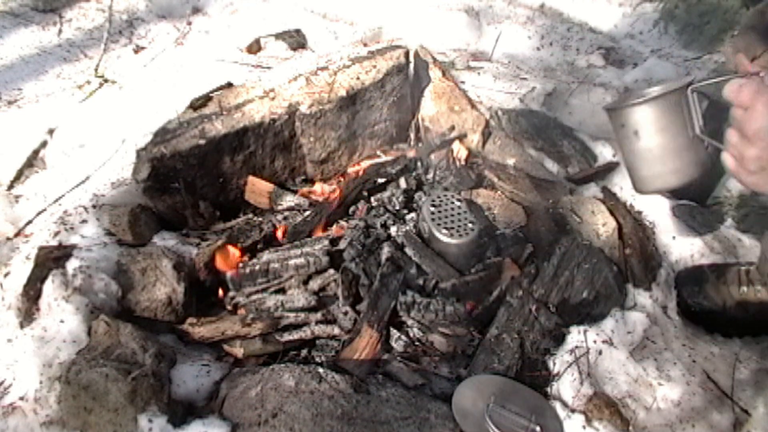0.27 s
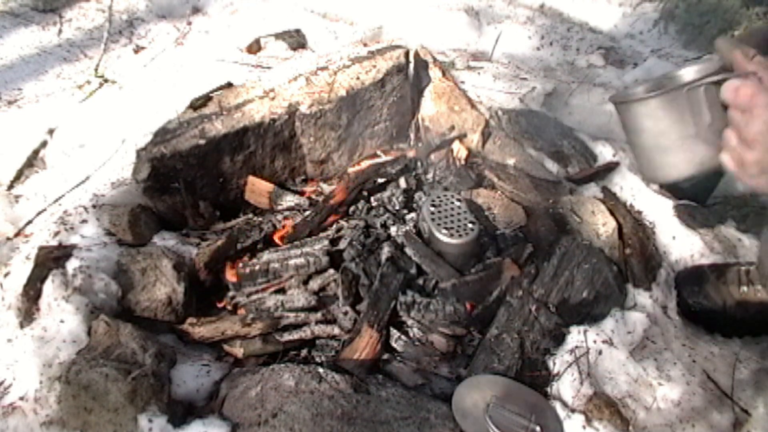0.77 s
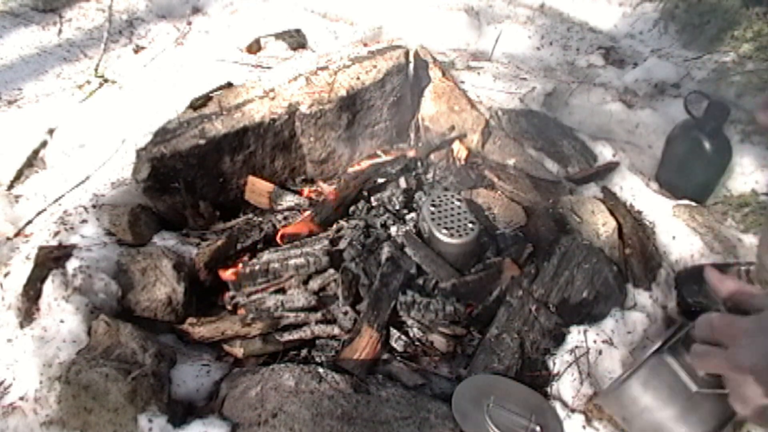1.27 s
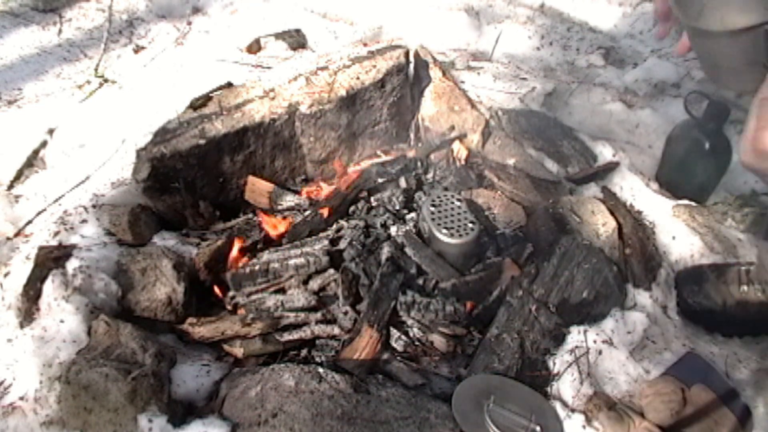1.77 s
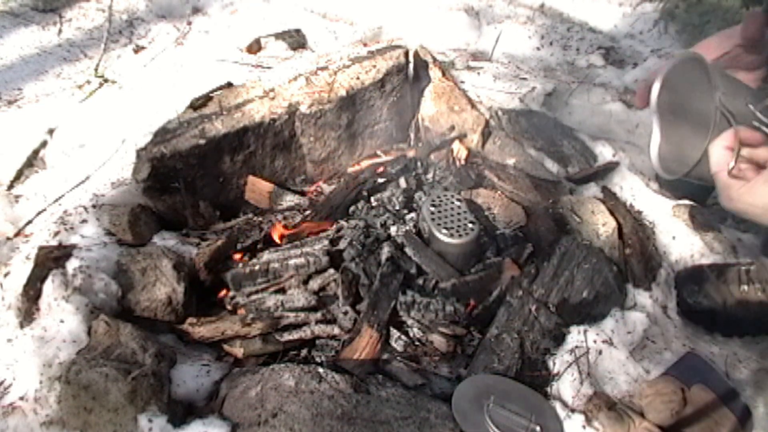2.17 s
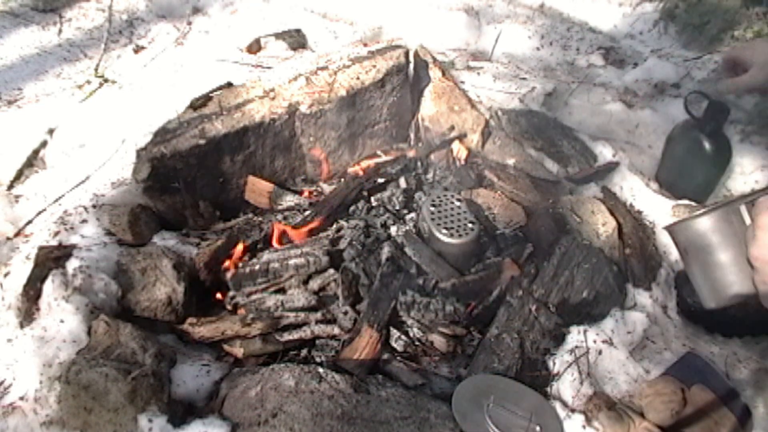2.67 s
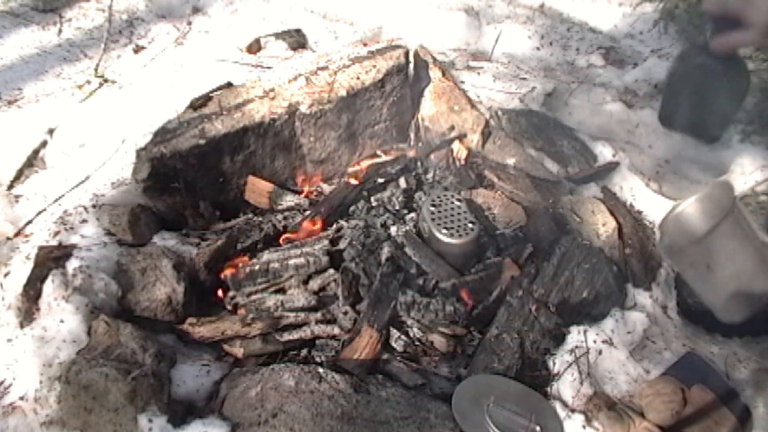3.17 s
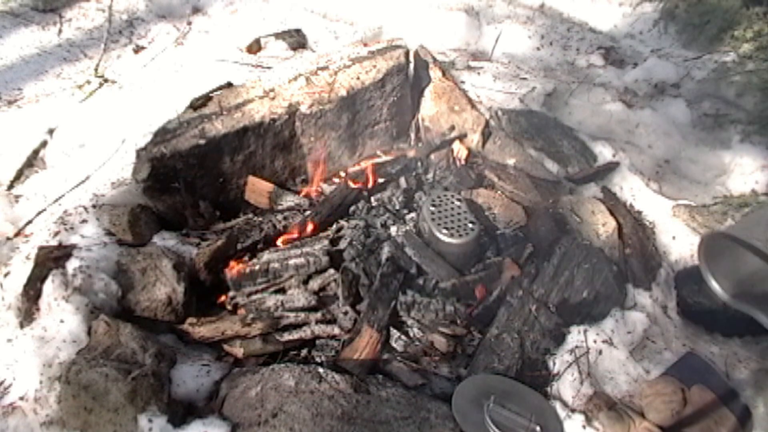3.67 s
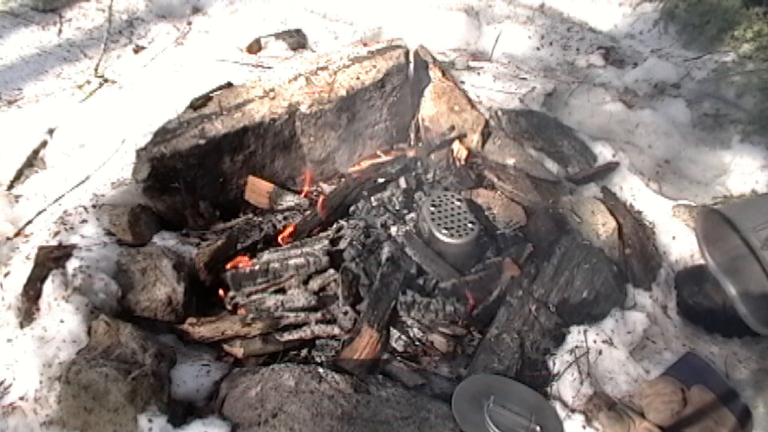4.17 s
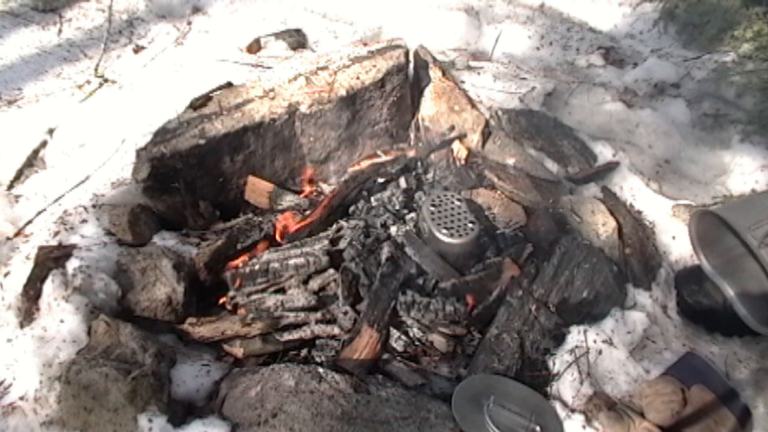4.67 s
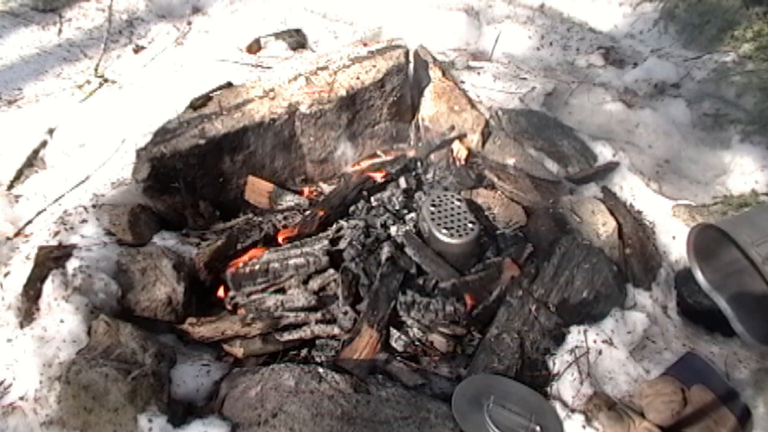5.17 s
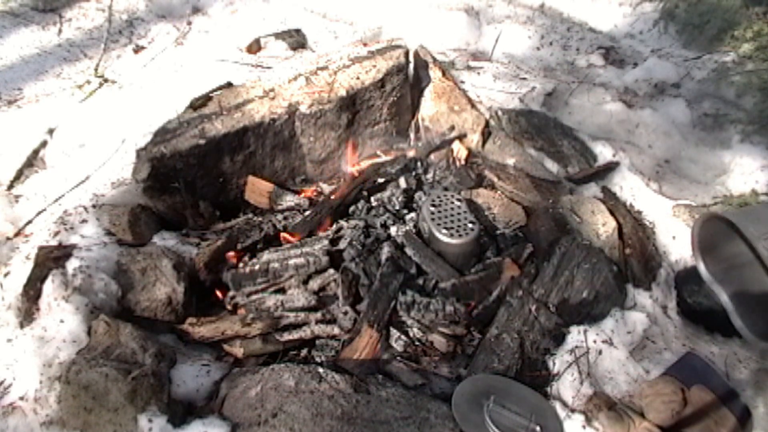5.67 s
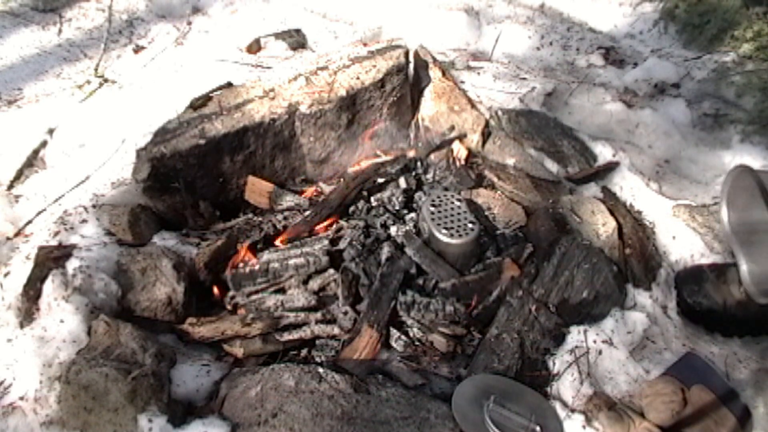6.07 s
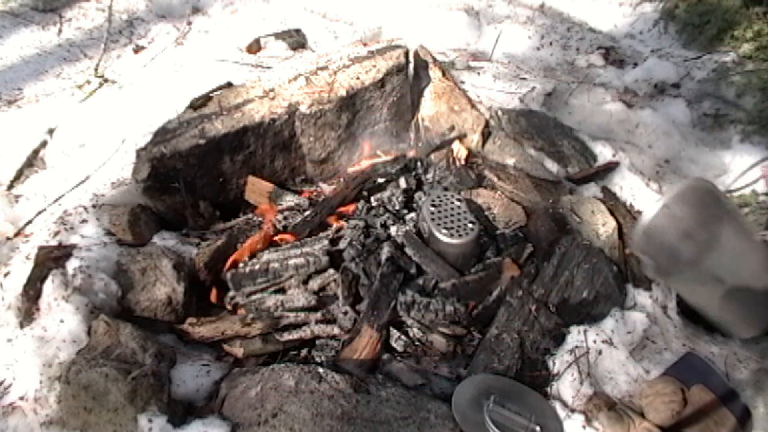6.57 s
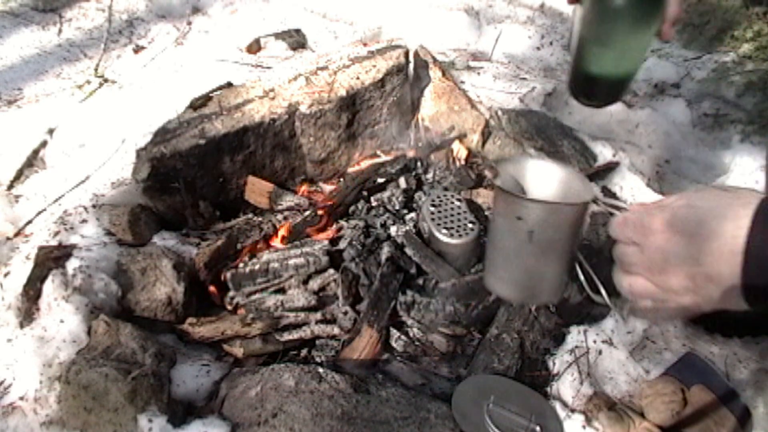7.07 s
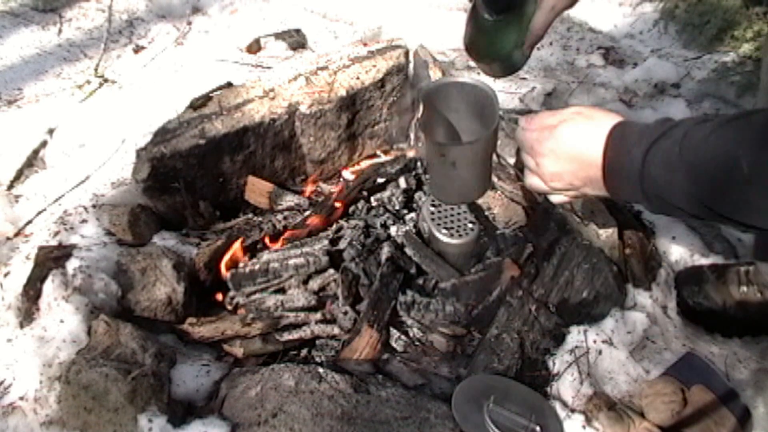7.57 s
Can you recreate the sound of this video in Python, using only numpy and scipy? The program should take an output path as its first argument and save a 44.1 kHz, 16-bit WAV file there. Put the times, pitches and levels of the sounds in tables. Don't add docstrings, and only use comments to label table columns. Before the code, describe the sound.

Bright metal cup clatter, loudest early on, gives way to plastic cap clicks, hollow bottle knocks and tiny fire pops outdoors.

```python
import sys
import numpy as np
from scipy import signal
from scipy.io import wavfile
from scipy.ndimage import uniform_filter1d

SR = 44100
rng = np.random.default_rng(int(sys.argv[2]) if len(sys.argv) > 2 else 0)


def attenuation_scalar(level_db):
    decades = np.asarray(level_db, float) / 20
    return 10 ** decades


def wav_record(signal):
    frames = np.transpose(np.atleast_2d(signal))
    bounded = np.clip(frames, -1, 1)
    quanta = np.round(bounded * 32767).astype(np.int16)
    wavfile.write(sys.argv[1], SR, quanta)


N = 345539

# frequency in Hz, level in dB per Hz.
AIR_SPECTRUM = [(20, -24.5), (30, -21.5), (60, -7.5), (95, 2.5), (250, -2.5), (600, -5), (1100, -11),
                (1600, -9.5), (2600, -20.5), (5000, -29.5), (11000, -28.5), (16000, -24.5)]
# frequency in Hz, level in dB per Hz.
RUSTLE_SPECTRUM = [(700, 9), (1500, -3.5), (3500, 5), (6500, -1.5), (11000, -3), (16000, -52)]
# frequency in Hz, likeness from 0 to 1.
LIKENESS = [(60, 0.69), (130, 0.86), (290, 0.93), (640, 0.9), (1410, 0.89), (3100, 0.81), (6820, 0.87),
            (15000, 0.59)]
# frequency in Hz, left minus right in dB.
LEAN = [(60, -0.5), (110, -0.5), (200, -0.5), (380, -0.5), (700, -0.5), (1290, -0.5), (2380, -2.5),
        (4400, -2.5), (8120, -1.0), (15000, 1.0)]
# start in seconds, peak in dB, centre in Hz.
LOUD_POPS = [(0.7236, -28, 4150), (0.7986, -21.5, 12200), (0.817, -30, 8600), (1.1262, -35, 8500),
             (1.734, -30, 6000), (2.856, -26.5, 11950), (3.5589, -18.5, 10800), (3.565, -26, 8000),
             (3.645, -34, 11300), (3.8612, -34, 4360), (3.9427, -34, 13100), (4.0786, -38, 9100),
             (4.2156, -27, 5270), (4.2202, -21, 10800), (4.733, -31.5, 9800), (4.9663, -24, 10240),
             (4.978, -30, 7800), (5.3483, -32.5, 6410), (5.3612, -29, 10960), (5.5356, -21.5, 7140),
             (5.5658, -35, 6800), (5.716, -28.5, 6440), (5.848, -35, 11800), (5.875, -36.5, 10200),
             (5.926, -36, 7640), (6.1677, -32, 6330), (6.4842, -33.5, 8700), (6.528, -32, 11700),
             (7.311, -28.5, 6740), (7.3662, -23.5, 13400), (7.504, -36.5, 7620), (7.7352, -34.5, 9900)]
# start in seconds, peak in dB.
WET_TICKS = [(5.788, -35), (6.0617, -32.5), (6.2258, -27), (6.31, -31), (6.334, -23.5), (6.3809, -31.5),
             (6.5863, -21), (6.6005, -33.5), (6.6714, -33), (6.845, -46), (7.2662, -36.5), (7.3244, -36),
             (7.8071, -33)]
# start in seconds, peak in dB,
# centre in Hz.
FAINT_POPS = [(1.1248, -34, 6620), (2.2827, -36, 5850), (2.7092, -41, 9240), (6.795, -33.5, 6000),
              (3.027, -44.5, 5940), (3.063, -38, 8870), (3.1951, -49, 5130), (3.5244, -44, 8750),
              (3.53, -35, 10200), (3.575, -27, 5480), (3.584, -36, 8680), (3.678, -42, 11900),
              (7.0, -37, 4480), (4.0073, -39, 13200), (4.0567, -45.5, 10800), (4.1704, -41, 8480),
              (4.4942, -43, 9420), (4.5136, -34, 6040), (4.6474, -49.5, 11340), (4.8653, -37, 11600),
              (5.111, -30, 11800), (6.942, -50, 5400), (5.4946, -42, 9640), (5.5704, -34, 6610),
              (5.585, -33, 11000), (5.6166, -43, 8450), (5.6597, -19, 9000), (5.7523, -43, 6470),
              (5.7828, -33.5, 5940), (5.8167, -42, 14000), (5.8257, -39, 9260), (5.8584, -40, 8280),
              (5.904, -36.5, 6100), (5.9648, -48, 5250), (5.9904, -43, 14000), (6.0013, -37.5, 6350),
              (6.0955, -39, 5840), (6.2744, -52, 6400), (6.4014, -41, 7460), (6.4564, -44, 6420),
              (6.5078, -35.5, 5400), (6.6897, -48, 5670), (6.9154, -35, 5130), (7.165, -40, 8400),
              (7.2374, -37, 7400), (7.2978, -37, 6170), (7.4584, -47, 7110), (7.475, -41, 9020),
              (7.7064, -37, 11600), (7.746, -35, 12500)]
# start in seconds, length in seconds, level in dB.
STROKES = [(0, 0.76, -48.5), (0.605, 1.1, -46), (1.189, 0.52, -45.5), (1.711, 0.34, -37),
           (2.02, 0.57, -48.5), (3.048, 0.21, -53), (4.01, 0.29, -55.5), (4.479, 0.14, -45),
           (4.835, 0.13, -48), (5.11, 0.22, -49), (5.447, 1.4, -56.5), (6.673, 0.65, -51),
           (6.738, 0.13, -49.5), (3.96, .08, -59.5), (4.208, 0.028, -43.5), (7.242, 0.19, -53),
           (7.598, 0.45, -56)]
# start
# in seconds, peak in dB, mode in Hz, t60 in seconds.
KNOCKS = [(1.311, -14.5, 1170, 0.028), (2.776, -48, 921, 0.12), (1.311, -26, 258.4, 0.008),
          (2.568, -29, 215, 0.02), (2.718, -34.5, 232, 0.041), (3.29, -35, 154, 0.051),
          (3.699, -33, 199, 0.023), (3.795, -31.5, 247, 0.018), (3.824, -39, 730, 0.052),
          (4.114, -43, 60, 0.18), (4.446, -25, 332, 0.024), (4.54, -39, 845, 0.092),
          (5.137, -33.5, 292, 0.11), (5.221, -26, 333, 0.051), (5.223, -34, 1820, 0.069),
          (5.255, -41.5, 746, 0.1), (5.576, -39.5, 1690, 0.066), (5.6561, -19, 1593, 0.049),
          (5.657, -18.5, 580, 0.062), (5.679, -35, 758, 0.12), (6.167, -29.5, 258, 0.018),
          (6.258, -37, 851, 0.073), (6.552, -38, 837, 0.066), (7.674, -40.5, 854, 0.11),
          (7.69, -38, 306, 0.2), (7.724, -36, 376, 0.077)]
# start in seconds, peak in dB, centre in Hz.
CAP_SLIPS = [(4.118, -22, 1860), (4.2415, -24.5, 2160), (4.29, -38.5, 2110), (4.4465, -9.5, 3300),
             (4.466, -15.5, 2310), (4.5198, -31, 6200), (4.5359, -20, 4350), (4.5414, -14.5, 2720),
             (4.547, -16, 4600), (4.5543, -11, 4100), (4.563, -18, 3620), (4.5685, -23, 2100),
             (4.575, -28, 2640), (4.588, -25, 4950), (4.5917, -23.5, 2200), (4.8249, -29, 2000),
             (4.8405, -22, 1680), (4.85, -34, 2600), (4.914, -23.5, 3600), (4.908, -23.5, 4350),
             (4.921, -27, 2880), (5.1321, -25.5, 1860), (5.138, -16, 2050), (5.1855, -29, 2860),
             (5.193, -32.5, 2230), (5.222, -8, 4750), (5.2256, -13.5, 2250), (5.259, -30, 1846),
             (5.6562, -11, 4000), (5.667, -21, 2450), (6.6897, -31.5, 2710), (7.676, -33, 2920)]
# frequency in Hz, level in dB, t60 in seconds.
WALL_MODES = [(1311, -7, 0.12), (1720, -7.5, 0.16), (1974, -8, 0.26), (2180, -6.5, .17), (2358, -19.5, 0.3),
              (2761, 1.5, 0.05), (2963, -4.5, .26), (3371, -9.5, .2), (3731, -9, 0.11), (3854, -7.5, 0.17),
              (3951, -13, 0.2), (4291, -1, 0.16), (4364, -4.5, .17), (4719, -8.5, 0.15), (4791, -6.5, 0.17),
              (5367, -6, .14), (5717, -11, 0.18), (5899, -6.5, .13), (6032, -5, 0.14), (6340, -13, 0.081),
              (7092, -4, .14), (7170, 1, 0.034), (8300, -8, .12), (9100, -10, 0.09), (9540, -11.5, 0.1)]
# frequency in Hz, level in dB, t60 in seconds.
BOOM_MODES = [(744, 8.5, 0.054), (926, -6, 0.33)]
# frequency in Hz, level of a mode in dB.
SHEET_SPECTRUM = [(300, -33), (600, -21.5), (919, -22), (1570, -11), (2240, -10.5), (2440, -16), (2760, -4),
                  (3390, -1.5), (3830, 1.5), (5870, 0), (9500, -3), (16000, -9)]
# start in seconds, peak in dB, rattle length in seconds, wall boom in dB.
CLANKS = [(0.0001, -11.5, 0.0087, -26), (0.0167, -12, 0.018, -16.5), (0.0764, -11.5, 0.011, -32),
          (0.082, -8.5, 0.034, -29), (0.125, -23, 0.0097, -40), (0.168, -22, 0.0097, -32),
          (0.2872, -16.5, 0.033, -22), (0.359, -22.5, 0.017, -30.5), (0.9034, -22, 0.014, -32.5),
          (0.934, -19, 0.0073, -24), (0.994, -24, 0.014, -31.5), (1.015, -12, 0.014, -33.5),
          (1.0328, -15, 0.022, -33.5), (1.1458, -19, 0.024, -19), (1.179, -17, 0.034, -37),
          (1.214, -33.5, 0.013, -22), (1.262, -8.5, 0.028, -26), (1.294, -8.5, 0.017, -36.5),
          (1.3122, 3.5, 0.018, -27.5), (1.32, -3, 0.022, -32), (1.3394, -3, 0.032, -40),
          (1.3787, 4.5, 0.016, -39), (1.3987, 0, .028, -35), (1.417, -11.5, 0.025, -31),
          (1.444, -23.5, 0.021, -30), (1.491, -32.5, 0.02, -18),
          (1.742, -15, 0.071, -44.5), (1.7593, -15, 0.018, -7), (1.764, -15, 0.022, -31.5),
       (1.832, -25.5, 0.075, -35.5), (1.846, -6, 0.022, -35.5), (1.884, -8.5, 0.053, -39.5),
       (1.922, -3, 0.03, -37), (1.94, -9.5, 0.016, -7.5), (1.949, -7, 0.016, -32.5),
       (2.053, -22, 0.015, -30), (2.062, -13, 0.017, -20), (2.084, -13.5, 0.057, -13),
       (2.1057, -7, 0.012, -15), (2.146, -10.5, 0.023, -18), (2.164, -13.5, 0.023, -50),
       (2.196, -20.5, 0.0082, -13), (2.243, -30, 0.016, -16), (2.31, -15, 0.0042, -27.5),
       (2.389, -20, 0.012, -20), (2.474, -28, 0.012, -27), (2.709, -38.5, 0.038, -13),
       (2.7745, -26.5, 0.0048, -27), (3.2267, -35.5, 0.01, -23.5), (3.704, -31.5, 0.0057, -10.5),
          (1.047, -11.5, .004, -35),
    (1.765, -21, .004, -22.5),
    (1.884, -14, .004, -31),
    (2.069, -12.5, .005, -19),
    (2.1033, -14.5, .008, -27),
    (2.973, -44, .008, -30),
]
# start in seconds,
# level in dB, mode in Hz, t60 in seconds, stop in seconds.
SINGS = [(.02, -27, 2966, 0.49, 0.14), (0.087, -25, 2966, 0.28, 0.24), (.29, -28.5, 924, 0.057, .4),
         (1.04, -28, 2970, 0.19, 1.14), (1.05, -38.5, 924, 0.27, 1.23), (1.311, -21.5, 924, 0.37, 1.41),
         (1.385, -22, 1976, .25, 1.62), (1.4, -36.5, 1498, 1.8, 1.74), (1.41, -36.5, 2358, 0.6, 1.64),
         (1.855, -24, 2180, .25, 1.93), (1.855, -27.5, 924, 0.76, 2.1), (1.944, -28.5, 924, 0.36, 2.06),
         (1.939, -8, 2760, 0.057, 2.05), (2.067, -23.5, 4792, .7, 2.17), (2.2, -43, 3035, 0.9, 2.37),
         (2.315, -41, 1976, 0.46, 2.6), (2.6, -53, 924, 2.3, 2.85), (3.705, -43, 920, 0.3, 3.8),
         (.003, -38, 1974, .4, .2), (.003, -33, 760, .15, .1), (1.018, -33, 1500, .05, 1.07),
         (1.05, -40, 1975, .3, 1.15), (1.145, -38, 1235, .1, 1.21), (1.27, -31, 765, .15, 1.33),
         (1.315, -21, 1974, .4, 1.4), (1.315, -22, 2181, .35, 1.52), (1.76, -34, 1724, .2, 1.85),
         (1.765, -30, 765, .15, 1.85), (2.1, -25, 2756, .07, 2.15), (2.148, -28, 2754, .1, 2.2),
         (2.16, -35, 761, .3, 2.3), (2.39, -40, 662, .08, 2.44), (2.31, -40, 2966, .3, 2.45),
         (.004, -36, 922, .3, .12), (2.312, -39, 924, .3, 2.42), (6.78, -59, 2990, .5, 6.9),
         (7.0, -61, 3720, .4, 7.12),
         (.002, -21, 4296, 0.096, 0.1), (.002, -26, 3733, 0.15, .08), (.018, -27, 4882, 0.13, 0.09),
            (.05, -33, 5906, .3, 0.089), (0.08, -18, 4290, 0.077, 0.14), (0.079, -21, 3790, 0.089, .16),
            (0.09, -32, 5903, 0.22, 0.22), (.128, -32, 4860, 0.14, .22), (.168, -38, 3758, .15, 0.26),
            (0.289, -35, 4362, 0.26, 0.62), (0.289, -44, 4177, .15, 0.4), (0.932, -36, 4780, .1, 1.2),
            (.933, -38, 3080, .08, 1.2), (1.017, -26, 4789, 0.071, 1.1), (1.017, -25, 6788, 0.073, 1.2),
            (1.017, -28, 3048, .1, 1.3), (.077, -17, 9400, 0.082, .15), (1.182, -34, 3769, 0.26, 1.5),
            (1.262, -20.5, 4393, 0.088, 1.5), (1.311, -2.5, 6032, 0.05, 1.8),
            (1.311, -6, 7093, 0.066, 1.56), (1.326, -24, 3852, 0.6, 1.6), (1.377, -11, 4721, 0.17, 1.74),
            (1.377, -10.5, 2961, 0.057, 1.8), (1.409, -21, 4579, 0.12, 1.8), (2.066, -31, 9800, 0.12, 2.5),
            (1.755, -32, 5973, .08, 1.8), (1.758, -35, 3860, .2, 1.85), (1.849, -22, 2766, 0.23, 2.15),
            (1.85, -27, 4789, 0.56, 2.4), (1.85, -27, 6020, 0.16, 2.3), (1.922, -26, 4362, .25, 2.5),
            (1.922, -24, 6036, .15, 2.4), (1.945, -22, 3858, 0.22, 2), (1.961, -39, 3035, 0.72, 2.1),
            (2.066, -17, 6800, 0.071, 2.8), (2.309, -35, 3370, 0.28, 2.5), (2.39, -45, 3956, .2, 2.8),
            (2.39, -47, 4768, .2, 2.7), (2.974, -50.5, 4760, .25, 3.2)]

AIR_DB = -51.5
TICK_HZ = 3750
STROKE_ATTACK, STROKE_RELEASE, STILL_DB = 0.21, 0.36, -59
BOTTLE_MID_S, BOTTLE_HALF_S = 5.25, 1.4
DULL_DB, DULL_PER_DB = -10.5, 0.17
RING_DB, RING_PER_DB = -7.5, 0.034
TILT_DB, TILT_PER_BOOM_DB, TILT_PER_DB = 0, 0.2281, 0.2673
LIGHT_FROM_S, LIGHT_TILT_DB = 2.7, 8
SWELL_SHARE = 0.28
PORT_LAG = 0.45
DIP_HZ, DIP_WIDTH_HZ, DIP_DEPTH = 484, 150, 0.87
LIMIT_DB, RELEASE_DB_PER_S = -10, 56.5


def at_hz(points, hz):
    points = np.array(points)
    return np.interp(np.log(hz), np.log(points[:, 0]), points[:, 1])


def capsule_gain(hz, share=0.5):
    return attenuation_scalar(share * at_hz(LEAN, hz) * np.array([[1], [-1]]))


def add(track, s, piece):
    i = round(s * SR)
    track[..., i:i + piece.shape[-1]] += piece[..., :N - i]


def drift(rate_hz):
    steps_per_s = 40
    steps = rng.standard_normal(int(N / SR * steps_per_s) + 2)
    r = np.exp(-2 * np.pi * rate_hz / steps_per_s)
    slow = signal.lfilter([1], [1, -r], steps)
    return np.interp(np.arange(N) / SR * steps_per_s, np.arange(len(slow)), slow / slow.std())


def grains(per_s, spread_db, count):
    sizes = attenuation_scalar(spread_db * np.minimum(rng.exponential(1, count), 4))
    signs = rng.choice([-1, 1], count)
    return sizes * signs * (rng.random(count) < per_s / SR)


def ring(clicks, hz, t60):
    r, w = attenuation_scalar(-60 / (max(t60, .002) * SR)), 2 * np.pi * hz / SR
    return signal.lfilter([0, np.sin(w)], [1, -2 * r * np.cos(w), r * r], clicks + 1e-18)


def decaying(hz, t60, size):
    t = np.arange(size) / SR
    decay = attenuation_scalar(-60 * t / np.reshape(t60, (-1, 1)))
    return decay * np.sin(2 * np.pi * np.reshape(hz, (-1, 1)) * t)


def snap(hz, t60, width, tone):
    t = np.arange(SR // 10) / SR
    burst = rng.standard_normal(len(t)) * attenuation_scalar(-60 * t / t60)
    burst[0] = 2.5
    edges = [hz / width, min(hz * width, .45 * SR)]
    x = signal.lfilter(*signal.butter(2, edges, "band", fs=SR), burst)
    x += tone * ring(burst, hz, 8.0 / hz)
    return x / abs(x).max()


def bands(mid, side, spectrum, patchy_db):
    out, together = 0, drift(2.0)
    edges = 22 * 2 ** np.arange(0, 9.6, .5)
    for k, (low, high) in enumerate(zip(edges, edges[1:])):
        hz = np.sqrt(low * high)
        if hz < spectrum[0][0]:
            continue
        sos = signal.butter(2, [low, high], "band", fs=SR, output="sos")
        m, s = signal.sosfilt(sos, [mid[k % 2], side[k % 2]])
        alike = at_hz(LIKENESS, hz)
        flicker_db = patchy_db * (.6 * together + drift(9.0))
        gain = attenuation_scalar(at_hz(spectrum, hz) + flicker_db)
        stereo = np.sqrt(1 + alike) * m + np.sqrt(1 - alike) * s * [[1], [-1]]
        out = out + gain * capsule_gain(hz) * stereo
    return out / np.sqrt(np.mean(out ** 2))


def air():
    white = rng.standard_normal((4, N))
    return attenuation_scalar(AIR_DB) * bands(white[:2], white[2:], AIR_SPECTRUM, patchy_db=1.74)


def fire():
    out = np.zeros((2, N))
    ticks = [(s, db, TICK_HZ) for s, db in WET_TICKS]
    for s, db, hz in LOUD_POPS + ticks + FAINT_POPS:
        edge = attenuation_scalar(-8.0) * min(hz / 8000, 1) * snap(9000, .007, 2.1, 0)
        pop = snap(hz, .011, 1.5, .1) + edge
        add(out, s, attenuation_scalar(db - 2.0) * pop * capsule_gain(hz, 0.98))
    return out


def stroke_gain():
    t, gain = np.arange(N) / SR, np.full(N, attenuation_scalar(STILL_DB))
    for s, length, db in STROKES:
        u = (t - s) / length
        shape = np.clip(np.minimum(u / STROKE_ATTACK, (1 - u) / STROKE_RELEASE), 0, 1)
        gain = np.maximum(gain, attenuation_scalar(db) * shape)
    return gain


def rustle():
    rub = np.array([grains(3000, 2.0, N) for k in range(2)])
    out = stroke_gain() * attenuation_scalar(-3.5) * bands(rub, rub[:, ::-1], RUSTLE_SPECTRUM, patchy_db=3.5)
    on_cup = out[1] * (abs(np.arange(N) / SR - BOTTLE_MID_S) > BOTTLE_HALF_S)
    woken = sum(attenuation_scalar(db) * ring(on_cup, hz, t60 / 2) for hz, db, t60 in WALL_MODES[6:19:2] + BOOM_MODES)
    return out + attenuation_scalar(-41.5) * woken


def bottle():
    out, soft = np.zeros(N), np.zeros(SR // 4)
    soft[:3] = .25, .5, .25
    for s, db, hz, t60 in KNOCKS:
        push = ring(soft, hz, 5.54 / hz)
        add(out, s, attenuation_scalar(db) * ring(push, hz, t60) * hz * 2.96 / SR)
    return out * attenuation_scalar(np.array([[-.8], [.8]]))


def cap(cycles=64.5):
    out = np.zeros(N)
    for s, db, hz in CAP_SLIPS:
        t60 = cycles / hz
        click = snap(hz, t60, 1.85, 0.15)
        click += attenuation_scalar(DULL_DB + DULL_PER_DB * db) * snap(560, 0.079, 1.65, 0)
        click += attenuation_scalar(-9.5) * hz / 3500 * snap(11400, t60 / 2, 1.26, 0)
        add(out, s, attenuation_scalar(db - 5.0) * click)
    return out * attenuation_scalar(np.array([[-1.6], [1.6]]))


def handle_chatter(db, rattle_s, count, bounces_per_s=1800, uneven_db=2.0):
    t = np.arange(count) / SR
    rattle_s *= attenuation_scalar(-max(db + 2, 0))
    chatter = grains(bounces_per_s, uneven_db, count)
    chatter[0] = 3.1
    chatter *= np.exp(-(t / np.clip(rattle_s, .003, .06)) ** 1.58)
    swell_s = min(SWELL_SHARE * max(rattle_s - .01, 0), .005) * (db < -2)
    chatter *= np.minimum((t + .001) / (swell_s + .001), 1)
    return chatter / np.sqrt(np.sum(chatter ** 2))


def clanks(place_db=3.0, clatter_db=-7.0, clatter_t60=0.029):
    size, out = SR // 4, np.zeros((2, N))
    t = np.arange(size) / SR
    thicket_hz = np.sort(600 * (16500 / 600) ** rng.random(260) ** .6)
    short = [(f, clatter_db + at_hz(SHEET_SPECTRUM, f), clatter_t60 * (4000 / f) ** 0.049)
             for f in thicket_hz]
    hz, level_db, t60 = np.transpose(short + WALL_MODES + BOOM_MODES)
    kind = np.repeat([0, 1, 2], [len(short), len(WALL_MODES), len(BOOM_MODES)])
    hand = np.cos(np.pi / 2 * t / t[-1]) ** .5
    waves = decaying(hz, t60, size) * hand
    octaves = np.log2(np.minimum(hz, 9000) / 4000)
    for s, db, rattle_s, boom_db in CLANKS:
        ring_db = RING_DB + RING_PER_DB * (db + 21.5)
        tilt_db = TILT_DB + TILT_PER_BOOM_DB * (boom_db + 19.0) + TILT_PER_DB * (db + 21.0)
        tilt_db += LIGHT_TILT_DB * (s > LIGHT_FROM_S)
        mode_db = level_db + np.array([0, ring_db, boom_db + 17.0])[kind] + tilt_db * octaves
        mode_db = mode_db + place_db / (1 + kind) * rng.standard_normal(len(hz))
        strength = attenuation_scalar(mode_db) * rng.choice([-1, 1], len(hz))
        lean = attenuation_scalar(at_hz(LEAN, hz) / 2 + (0.5 + hz / 7000) * rng.standard_normal(len(hz)))
        body = np.array([strength * lean, strength / lean]) @ waves
        chatter = handle_chatter(db, rattle_s, size // 2)
        add(out, s, attenuation_scalar(db - 16.5) * signal.fftconvolve(body, chatter[None], axes=1))
    return out


def singing_modes():
    out, held = np.zeros((2, N)), np.arange(SR // 2) / SR
    for s, db, hz, t60, stop in SINGS:
        window = np.clip(held / .004, 0, 1) * np.clip((stop - s - held) / .05, 0, 1)
        add(out, s, attenuation_scalar(db) * capsule_gain(hz) * decaying(hz, t60, SR // 2) * window)
    return out


def cup():
    return signal.sosfilt(signal.butter(3, 400, "high", fs=SR, output="sos"), clanks() + singing_modes())


def scene():
    near = cup() + cap() + bottle()
    dull = signal.lfilter([.25], [1, -.75], near)
    for delay_s, db in [(.0043, -25.5), (.011, -14.5)]:
        add(near, delay_s, attenuation_scalar(db) * dull[::-1])
    step = (1 - PORT_LAG) / (1 + PORT_LAG)
    near[0] = signal.lfilter([step, 1], [1, step], near[0])
    return near + fire() + rustle() + air()


def roll_off(x):
    return signal.sosfilt(signal.butter(12, 16430, fs=SR, output="sos"), x)


def record(dry):
    r, w = np.exp(-np.pi * DIP_WIDTH_HZ / SR), 2 * np.pi * DIP_HZ / SR
    band = signal.lfilter(np.array([1, 0, -1]) * (1 - r * r) / 2, [1, -2 * r * np.cos(w), r * r], dry)
    x = dry - DIP_DEPTH * band
    x = signal.sosfilt(signal.butter(2, 40, "high", fs=SR, output="sos"), x)
    fall = RELEASE_DB_PER_S * np.arange(N) / SR
    level_db = 10 * np.log10(uniform_filter1d(np.mean(x ** 2, axis=0), size=200) + 1e-12)
    held_db = np.maximum.accumulate(level_db + fall) - fall
    over_db = np.maximum(held_db - LIMIT_DB, 0)
    cut_db = signal.lfilter([.004], [1, -.996], over_db)
    x = np.clip(x * attenuation_scalar(-cut_db), -.98, .98)
    x = signal.sosfilt(signal.cheby2(8, 35, 16450, fs=SR, output="sos"), x)
    return roll_off(x)


dry = scene()
out = record(dry)
wav_record(out)
```